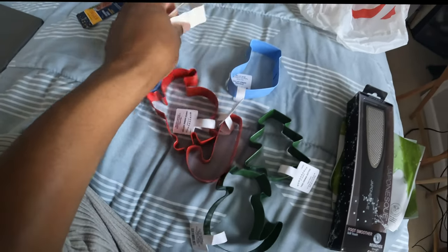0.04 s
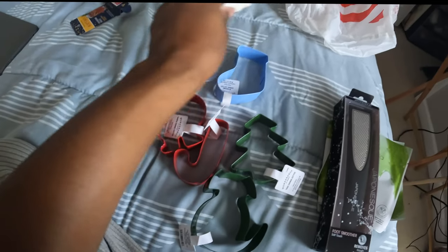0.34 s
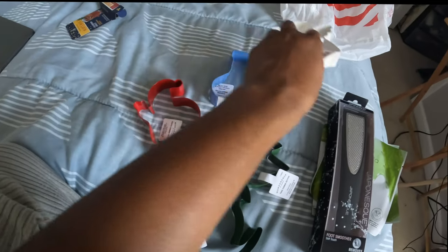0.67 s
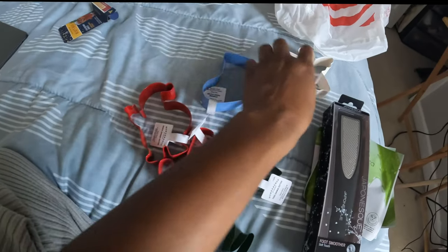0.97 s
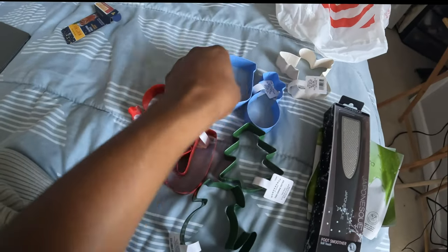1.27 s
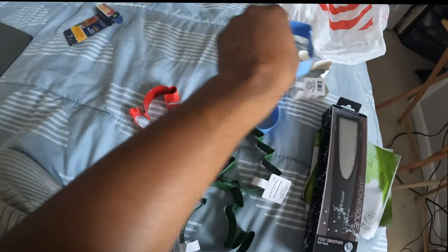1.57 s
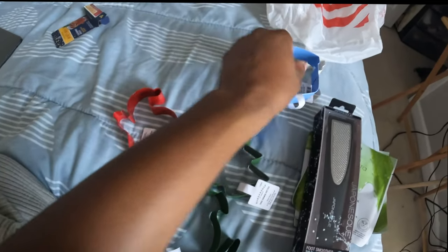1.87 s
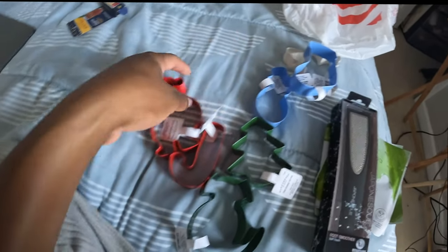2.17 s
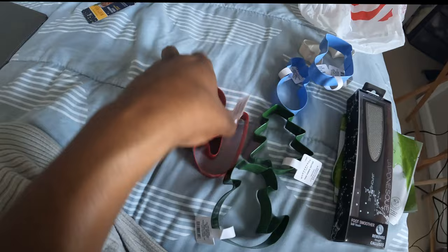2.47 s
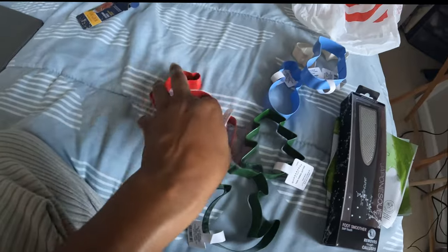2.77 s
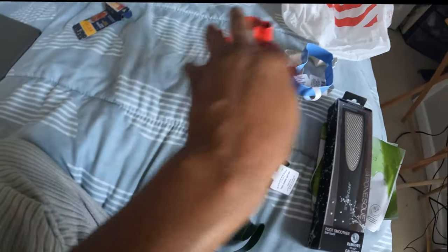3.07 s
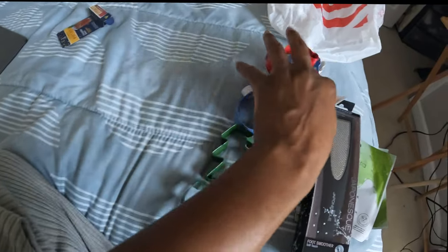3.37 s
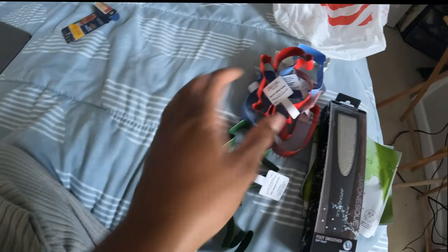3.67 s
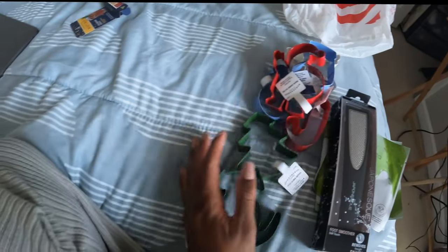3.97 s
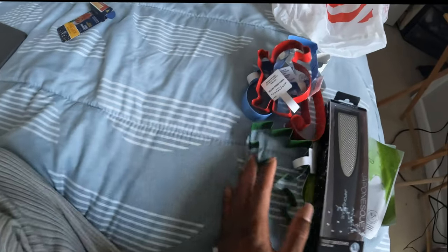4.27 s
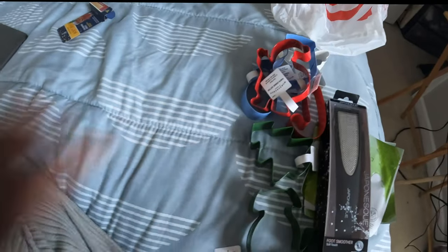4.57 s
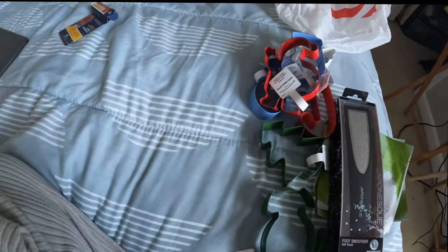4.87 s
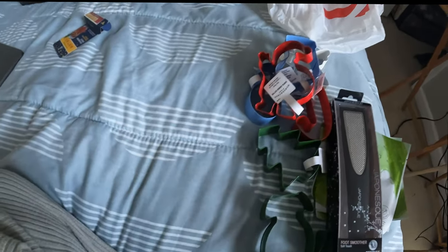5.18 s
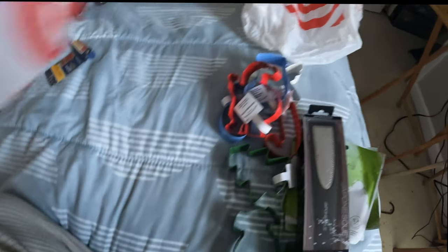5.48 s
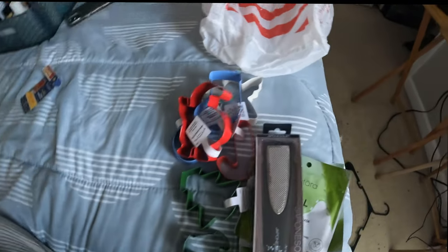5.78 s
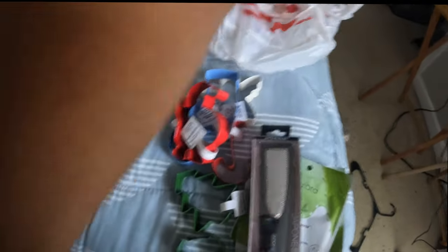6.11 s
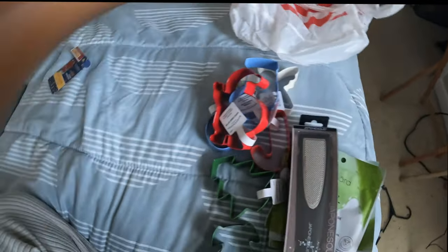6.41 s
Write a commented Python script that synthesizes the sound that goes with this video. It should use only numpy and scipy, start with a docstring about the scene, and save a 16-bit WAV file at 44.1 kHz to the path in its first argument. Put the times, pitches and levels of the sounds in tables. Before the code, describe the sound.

In a small, soft-sounding room, metal cookie cutters clink and chatter against each other in irregular clusters, the loudest hits slightly overloading the nearby microphone. Fingers and paper tags brush over bedding between the clinks. After a last flurry of clatter and sliding, a thin plastic bag is dragged by with dense crackling, moving from the left toward the centre, while faint handling rumble grows near the end.

```python
"""Painted sheet-metal cookie cutters, picked off a quilt and stacked by hand near a phone in a bedroom. Rims
clash, chatter and ring; the loudest clashes are flattened at their peaks. Fingers and paper tags brush between
the clinks. Then a thin plastic bag is dragged past, its creases buckling, its sheet flapping. The hand holding
the phone rumbles throughout."""
import sys
import numpy as np
from scipy import signal
from scipy.fft import rfft, irfft, next_fast_len
from scipy.io import wavfile

SR = 44100
rng = np.random.default_rng(int(sys.argv[2]) if len(sys.argv) > 2 else 0)


def persist_wave(psi):
    """Save psi, clipped to +-1, as 16-bit WAV."""
    counts = np.round(np.clip(psi, -1, 1) * 32767).astype(np.int16)
    wavfile.write(sys.argv[1], SR, np.atleast_2d(counts).T)


N = 284268
TIME_S = np.arange(N) / SR

# rim clashes: start_s, level_db, chatter_s, tones_db, focus_hz, cutter
CLINKS = [ (0.0614, 4, 0.017, -17, 5000, "white"), (.092, 9, 0.019, -13, 4960, "white"),
          (.176, -20, .006, -3, 5960, "white"), (.22, -21, 0.0033, -12, 5680, "white"),
          (1.007, -1, 0.0065, -4.5, 3970, "star"), (1.037, -4.5, 0.0014, -3.5, 1200, "star"),
          (1.155, -21.5, 0.0022, -6, 5290, "star"), (1.1636, -15.5, 0.0035, -0.5, 7220, "star"),
          (1.179, -5.5, 0.0068, -6, 1920, "star"), (1.4467, -9.5, 0.0069, -3, 5560, "star"),
          (1.487, -19, .002, 0.5, 2470, "star"), (1.9213, 9, 0.012, 0.5, 5600, "blue"),
          (1.977, -7.5, .002, -3, 5700, "blue"), (2.021, -8.5, 0.0031, -12, 3380, "blue"),
          (2.4171, -25.5, .003, -1, 5000, "red"), (2.493, -21, 0.0033, 1, 4400, "red"),
          (2.592, -19, 0.0023, -11, 5760, "red"), (2.7072, -15, 0.0024, 1, 3780, "red"),
          (2.722, -21.5, 0.0037, 1.5, 1880, "red"), (2.897, -26, 0.00085, -15, 5600, "red"),
          (2.981, -18, 0.0013, -3, 3980, "red"), (3.043, -26, .002, -20, 5560, "red"),
          (3.4535, 5.5, 0.012, -23, 4800, "pile"), (3.463, -4, .01, 2.5, 3160, "pile"),
          (3.602, -2, 0.0046, -11, 6400, "pile"), (3.617, 5.5, 0.03, -9, 6600, "pile"),
          (3.648, 3, 0.0082, -0.5, 4900, "pile"), (3.726, -8, 0.012, -25, 4630, "pile"),
          (3.753, -11, 0.0033, -8, 1302, "pile"), (3.7814, -7.5, 0.0013, -7, 10900, "pile"),
          (4.017, -.5, 0.013, -8, 3800, "green"), (4.059, -2, 0.011, -22, 5200, "green"),
          (4.099, 3, 0.0017, -15, 10200, "green"), (4.128, 4, 0.013, -7, 5600, "green"),
          (4.217, -8, .004, -4.5, 5600, "green"), (4.282, -12.5, 0.0026, -6, 3970, "green"),
          (4.3325, -11.5, 0.0016, 4, 3120, "green"), (4.342, -12.5, 0.0042, -1, 4860, "green"),
          (4.399, -6.5, 0.0029, -4, 1500, "green"), (4.417, -22.5, 0.0016, 6, 4960, "green")]
# knocks damped by fingers or quilt: start_s, level_db, centre_hz, t60_s
KNOCKS = [(0.206, -14, 1360, 0.033), (.29, -18, 1870, .016), (1.372, -16, 1960, 0.05),
          (1.46, -22, 74.5, 0.22), (1.536, -11, 2200, 0.031), (1.586, -30.5, 2760, 0.019),
          (1.872, -36, 2500, 0.093), (1.8977, -22.5, 3000, 0.06), (1.932, -12, 1203, 0.21),
          (1.952, -16, 74.6, .2), (2.5, -21.5, 88, .3), (2.542, -19, 3950, .028),
          (2.677, -21.5, 2660, .023), (2.7773, -18, 3170, 0.017), (3.5544, -8, 2370, .014),
          (3.557, -13, 795, 0.42), (3.559, -15.5, 217, 0.249), (3.739, -16.5, 1190, 0.19),
          (3.8387, -15, 1380, 0.015), (4.401, -13, 1170, 0.33)]
# modes per cutter: mode_hz, level_db
CUTTER_MODES = {"white": [(1809, -8), (2105, -6), (3077, -6), (4519, -2), (4646, 0), (5712, -3), (6856, -3),
                (7612, -6), (7760, -6), (9582, -5)], "star": [(1069, -11), (1214, -7), (1534, 0),
                (1860, -8), (2231, -10), (2385, -6), (2845, -5), (3063, -11), (3370, -10), (3472, -8),
                (3908, -8), (4288, -13), (5268, -5), (6245, -10), (6557, -8), (6656, -5), (10705, -11),
                (11111, -17)], "blue": [(942, -14), (2727, -14), (3152, -14), (4605, 0), (5187, -11),
                (5381, -13), (5782, -5), (6124, -13), (6535, -14), (7965, -14), (9641, -24), (11103, -18)],
                "red": [(1787, -9), (2110, -5), (2842, -10), (3577, -3), (3704, -2), (4393, 0), (4597, -6),
                (5766, -3), (6447, -11), (7655, -7)], "pile": [(1704, -10), (2810, -10), (3128, 0),
                (3521, -6), (3696, -8), (3793, -8), (3938, -1), (4619, -8), (4867, -2), (5227, -2),
                (5335, -2), (5790, -5), (6428, -4), (6947, -1), (8274, -13)], "green": [(2842, -4),
                (3117, 0), (3698, -7), (4280, -7), (4455, -7), (4603, -3), (4883, 0), (4998, -6),
                (5739, -6), (6218, -6), (6713, -5), (7367, -11), (9415, -14), (9512, -13)]}
# ring time per cutter at 4 kHz: t60_s
CUTTER_T60_S = {"white": .11, "star": .12, "blue": .07, "red": .08, "pile": .14, "green": .12}
# treble shelf per cutter: gain_db
CUTTER_TREBLE_DB = {"white": 4.1, "star": 5.4, "blue": -.5, "red": 2.8, "pile": -1.6, "green": 0.57}
# cutters and tags slid over the quilt: start_s, length_s, friction_db, bump_db
STROKES = [(-.05, 0.32, -33, -33.5), (.92, 0.1, -37, -35), (1.15, .09, -45, -48), (1.35, .15, -37.5, -34.5),
           (1.62, 0.1, -65, -43), (2.12, 0.31, -53, -44), (2.455, .12, -38, -38), (2.642, 0.2, -41, -35.5),
           (2.862, .1, -37.5, -50), (3.386, 0.057, -39.5, -48), (3.57, 0.11, -15.5, -38),
           (3.904, 0.39, -31.5, -33), (4.166, 0.24, -22, -27.5), (4.344, 0.091, -27, -24.5),
           (4.48, 0.15, -32.5, -41)]
# pulls on the bag: start_s, length_s, crackle_db, flap_db, crisp_db
PULLS = [(4.642, .07, -22.5, -24, -2), (4.888, 0.11, -12.5, -20, 2.5), (4.986, 0.11, -10.5, -18, 1.5),
         (5.117, 0.092, -11.5, -18, 2), (5.232, 0.2, -17, -21, 2.5), (5.466, 0.23, -18, -26, 4),
         (5.6, 0.092, -17.5, -28, 9), (5.718, 0.043, -14.5, -25, 4), (5.879, 0.43, -21.5, -34.5, 1.5),
         (6.136, .1, -15, -25.5, 2)]
# bag's path past the phone: time_s, left_minus_right_db
BAG_PATH = [(4.7, 6.5), (5.05, 8.5), (5.45, 11), (5.7, 3.5), (5.95, 2.5), (6.25, 1)]

# weak modes of the sheet metal: freq_hz, density_db
METAL_SPECTRUM = [(200, -26.5), (600, -29), (1000, -6.5), (1600, -3.5), (3200, -3.5), (4700, -3.5),
                  (6900, 0), (8500, -10), (10800, -7), (13000, -14.5), (15500, -35.5)]
# friction on cloth and paper: freq_hz, density_db
FRICTION_SPECTRUM = [(200, -11.5), (600, -22), (1100, -2.5), (2400, -4.5), (5000, -6), (7200, -9.5),
                     (8800, -22.5), (11000, -15.5), (15400, -39)]
# quilt thuds and bumps: freq_hz, density_db
QUILT_SPECTRUM = [(35, 6), (80, -1.5), (130, -4.5), (190, 0.5), (290, -8), (450, -18), (1200, -30.5)]
# buckling film: freq_hz, density_db
CREASE_SPECTRUM = [(200, -8), (400, -5.5), (650, -0.5), (830, -2.5), (1060, 2.5), (1500, 1), (4100, -1.5),
                   (7600, -7), (9700, -15.5), (12400, -8.5), (14000, -17.5), (15500, -23)]
# flapping film: freq_hz, density_db
FLAP_SPECTRUM = [(50, -1), (90, 2), (170, 3.5), (270, 0), (400, -13), (700, -13), (1500, -69)]
# hand on the phone: freq_hz, density_db
GRIP_SPECTRUM = [(8, -6), (18, 9), (28, 2), (42, -2), (70, -19.5), (130, -49), (400, -60)]
# still room air: freq_hz, density_db
AIR_SPECTRUM = [(100, -19), (165, -2.5), (270, -12.5), (350, -19.5), (700, -21.5), (1500, -27),
                (4000, -45.5), (15400, -53.5)]

TOP_HZ = 15700


def cutters(thud_db=-20.5, thud_db_per_db=0.6):
    """All clinks and knocks. A harder clink thuds harder, less than in proportion."""
    out = np.zeros((2, N))
    for start_s, level_db, chatter_s, tones_db, focus_hz, cutter in CLINKS:
        relative_thud_db = thud_db + thud_db_per_db * level_db - level_db
        add(out, start_s, undb(level_db) * clink(chatter_s, tones_db, focus_hz, relative_thud_db, cutter))
    for start_s, level_db, centre_hz, t60_s in KNOCKS:
        add(out, start_s, undb(level_db) * knock(centre_hz, t60_s))
    return out * pan(-.3)


def clink(chatter_s, tones_db, focus_hz, thud_db, cutter, bounces_per_s=700, size=12288):
    """Rim bounces on rim: a crack, a crowd of short modes, a few long tones, a thud in the quilt."""
    time_s = np.arange(size) / SR
    bounces = (rng.random(size) < bounces_per_s / SR) * rng.exponential(size=size)
    blows = (time_s == 0) + bounces / (1 + (time_s / chatter_s) ** 6)
    response_db = sheet_response_db(cutter, focus_hz, size)
    crack = colour(noise(size, width=.45), METAL_SPECTRUM, response_db)
    crack *= ring(blows, t60_s=.018) + .2 * ring(blows, t60_s=.1)
    crowd = colour(mode_crowd(size), METAL_SPECTRUM, response_db) * ring(blows, t60_s=.055)
    tones = cutter_tones(cutter, focus_hz, blows, time_s)
    thud = colour(noise(size, width=.096), QUILT_SPECTRUM) * ring(blows, t60_s=.29)
    quilt_damping = 1 / (1 + (time_s / .09) ** 4)
    metal = undb(-6) * crack + undb(-3) * crowd + undb(tones_db - 4) * tones * quilt_damping
    return metal + undb(thud_db) * thud


def cutter_tones(cutter, focus_hz, blows, time_s):
    """Strong modes. Much leaks at once into the touching rim; the rest dies slowly, high modes first."""
    modes_hz, modes_db = np.transpose(CUTTER_MODES[cutter])
    scatter_db = 2 * rng.standard_normal(len(modes_hz))
    gains = undb(modes_db + contact_db(np.log2(modes_hz), focus_hz) + scatter_db)
    leak = .9 * ring(blows, t60_s=.04)
    tones = 0
    for mode_hz, gain in zip(modes_hz, gains / np.linalg.norm(gains)):
        phase_rad = 2 * np.pi * rng.random() + .66 * rng.standard_normal((2, 1))  # per microphone port
        t60_s = CUTTER_T60_S[cutter] * (4000 / mode_hz) ** .5
        tones += gain * np.sin(2 * np.pi * mode_hz * time_s + phase_rad) * (leak + ring(blows, t60_s))
    return tones


def contact_db(log2_hz, focus_hz, peak_db=6.1, width_oct=.31):
    """The place of contact favours one band."""
    return peak_db * np.exp(-((log2_hz - np.log2(focus_hz)) / width_oct) ** 2)


def sheet_response_db(cutter, focus_hz, size):
    """The sheet answers most near its strong modes and in the struck band."""
    modes_hz, modes_db = np.transpose(CUTTER_MODES[cutter])
    bins_hz = np.fft.rfftfreq(size, 1 / SR)
    half_width_hz = 30 + .009 * modes_hz
    detuning = (bins_hz[:, None] - modes_hz) / half_width_hz
    nearness = (undb(modes_db - modes_db.max()) / (1 + detuning ** 2)).sum(axis=1)
    treble_db = CUTTER_TREBLE_DB[cutter] * np.clip((bins_hz - 6500) / 3000, 0, 1)
    return contact_db(log2_bins(size), focus_hz) + treble_db + 10 * np.log10(1 + 7 * nearness)


def mode_crowd(size, count=90):
    """Weak modes, about evenly spread; each clink excites different ones."""
    modes_hz = (np.arange(count) + rng.random(count)) * TOP_HZ / count
    spectrum = np.zeros((2, size // 2 + 1), complex)
    spectrum[:, (modes_hz * size / SR).astype(int)] = noise(count, .35) + 1j * noise(count, .09)
    return irfft(spectrum, size)


def knock(centre_hz, t60_s, size=16384):
    """A held cutter cannot ring: one broad, short resonance."""
    offset_oct = log2_bins(size) - np.log2(centre_hz)
    hump_db = -10 * np.log10(1 + (offset_oct / .9) ** 4 + (offset_oct / 1.7) ** 10)
    band = unit_rms(irfft(rfft(noise(size, width=.44)) * undb(hump_db)))
    return band * ring(np.arange(size) == 0, t60_s)


def bag(attack_s=.053, fade_db_per_s=135):
    """Creases of thin film buckle in dense flurries; the whole sheet flaps when pulled."""
    starts_s, lengths_s, crackle_db, flap_db, crisp_db = np.transpose(PULLS)
    pulls = [swell(*span_s, attack_s, fade_db_per_s) for span_s in zip(starts_s, lengths_s)]
    carried = swell(4.67, 1.23, attack_s, fade_db_per_s) * undb(-26.5)  # crackle between pulls
    buckling = np.hypot(energy_sum(pulls, crackle_db), carried)
    snapping = np.hypot(energy_sum(pulls, crackle_db + crisp_db), carried)  # sharper when taut
    pan_db = np.interp(TIME_S, *np.transpose(BAG_PATH))
    dull, crisp, fizz = crease_bands()
    fizz_gain = undb(1.7 * (pan_db - 9))  # carries only right beside the left port
    film = (dull + fizz * fizz_gain) * buckling + crisp * undb(.5) * snapping
    flaps = colour(noise(N, width=.04), FLAP_SPECTRUM) * energy_sum(pulls, flap_db)
    flaps *= undb(1.65 * wander(rate_hz=35))
    return film * undb(3) * pan(pan_db) + flaps * pan(.84)


def crease_bands():
    """Film snaps in three bands. Long waves reach both ports more alike than short ones."""
    creases = crackle(rate_per_s=7000, spread_db=3.3)
    creases *= undb(.6 * wander(rate_hz=70) + .18 * wander(rate_hz=9.1))
    dull = lowpass(colour(stereo(creases, width=.44), CREASE_SPECTRUM), 3530)
    wide = colour(stereo(creases, width=.58), CREASE_SPECTRUM)
    treble = wide - lowpass(wide, 3980)
    crisp = lowpass(treble, 11900)
    fizz = treble - crisp
    return dull, crisp, fizz


def sliding(attack_s=.052, fade_db_per_s=126, arm_brush_db=-71.5, arm_press_db=-48.5):
    """Friction grains on cloth and paper; the quilt gives under the hand and the resting arm."""
    starts_s, lengths_s, friction_db, bump_db = np.transpose(STROKES)
    strokes = [swell(*span_s, attack_s, fade_db_per_s) for span_s in zip(starts_s, lengths_s)]
    friction = np.hypot(energy_sum(strokes, friction_db), undb(arm_brush_db))
    pressure = np.hypot(energy_sum(strokes, bump_db), undb(arm_press_db))
    snaps = stereo(crackle(rate_per_s=5000, spread_db=.91), width=.35)
    grains = colour(snaps, FRICTION_SPECTRUM) * friction * undb(.95 * wander(rate_hz=40))
    bumps = colour(noise(N, width=.39), QUILT_SPECTRUM) * pressure * undb(1.4 * wander(rate_hz=25))
    return grains + bumps


def grip(level_db=-24.5, swing_start_s=5.27, swing_rise_s=.37, swing_db=8.5):
    """The hand on the phone rumbles, more once it swings the phone round."""
    swing = np.clip((TIME_S - swing_start_s) / swing_rise_s, 0, 1)
    rumble = colour(noise(N, width=.35), GRIP_SPECTRUM)
    return rumble * undb(level_db + swing_db * swing + .9 * wander(rate_hz=2.7)) * pan(1.4)


def bedroom(x, low_t60_s=.31, high_t60_s=.19, split_hz=3000, wet_db=-13, size=22050):
    """Near walls answer within milliseconds; bedding absorbs the treble first."""
    time_s = np.arange(size) / SR
    echoes = noise(size, width=.13)
    low = signal.sosfilt(signal.butter(2, split_hz, fs=SR, output="sos"), echoes)
    high = signal.sosfilt(signal.butter(2, split_hz, "high", fs=SR, output="sos"), echoes)
    onset = np.clip(time_s / .008 - .5, 0, 1)
    tail = (low * undb(-60 * time_s / low_t60_s) - high * undb(-60 * time_s / high_t60_s)) * onset
    tail /= np.linalg.norm(tail, axis=1, keepdims=True)
    return x + undb(wet_db) * signal.fftconvolve(x, tail, axes=1)[:, :N]


def room_air(level_db=-46.5):
    """Faint, steady hush of still air."""
    return colour(noise(N, width=.87), AIR_SPECTRUM) * undb(level_db)


def ring(blows, t60_s):
    """Resonance envelope, peak 1. Blows land at unrelated phases, so their energies add."""
    retention = np.exp(-2 * np.log(1000) / (t60_s * SR))
    envelope = np.sqrt(signal.lfilter([1], [1, -retention], blows) + 1e-18)
    return envelope / envelope.max()


def swell(start_s, length_s, attack_s, fade_db_per_s):
    """Hand movement: gathers speed, holds, dies away."""
    rise = np.clip((TIME_S - start_s) / attack_s, 0, 1) ** 2
    return rise * undb(-fade_db_per_s * np.maximum(TIME_S - start_s - length_s, 0))


def energy_sum(swells, levels_db):
    """Joint amplitude of overlapping movements."""
    return np.sqrt(undb(levels_db) ** 2 @ np.square(swells) + 1e-18)


def crackle(rate_per_s, spread_db):
    """Two trains of randomly timed snaps, a few larger than the rest."""
    sizes = undb(spread_db * np.minimum(rng.exponential(size=(2, N)), 4))
    fires = rng.random((2, N)) < rate_per_s / SR
    return fires * sizes * np.sign(rng.standard_normal((2, N)))


def wander(rate_hz):
    """Random drift, standard deviation near 2."""
    steps = rng.standard_normal(4096)
    return 2.5 * np.interp(TIME_S * rate_hz, np.arange(len(steps)), steps)


def noise(size, width):
    """Stereo white noise."""
    return stereo(rng.standard_normal((2, size)), width)


def stereo(sources, width):
    """Two unrelated signals as mid and side, rms 1."""
    return unit_rms(sources[0] + width * sources[1] * np.array([[1], [-1]]))


def pan(left_minus_right_db):
    """Left and right gains."""
    gains = undb(np.array([[.5], [-.5]]) * left_minus_right_db)
    return gains / gains.mean(axis=0)


def from_right(x, lag_s):
    """A source on the right reaches the left port later."""
    size = next_fast_len(N + 64)
    delay = np.exp(-2j * np.pi * np.fft.rfftfreq(size, 1 / SR) * lag_s)
    return np.array([irfft(rfft(x[0], size) * delay, size)[:N], x[1]])


def colour(x, spectrum, extra_db=0):
    """Filter by (freq_hz, density_db) points, to rms 1."""
    freq_hz, density_db = np.transpose(spectrum)
    size = next_fast_len(x.shape[-1])
    gain = undb(np.interp(log2_bins(size), np.log2(freq_hz), density_db) + extra_db)
    return unit_rms(irfft(rfft(x, size) * gain, size)[..., :x.shape[-1]])


def lowpass(x, cutoff_hz):
    """Zero-phase low-pass."""
    return signal.sosfiltfilt(signal.butter(2, cutoff_hz, fs=SR, output="sos"), x)


def log2_bins(size):
    """Log2 frequency of each Fourier bin."""
    return np.log2(np.fft.rfftfreq(size, 1 / SR) + 1)


def add(out, start_s, sound):
    """Mix a sound in at start_s."""
    start = int(start_s * SR)
    out[:, start:start + sound.shape[1]] += sound[:, :N - start]


def unit_rms(x):
    """Scale to rms 1."""
    return x / np.sqrt(np.mean(x ** 2) + 1e-18)


def undb(db):
    """Decibels to gain."""
    return np.exp(np.asarray(db) * np.log(10) / 20)


def scene():
    """Cutters, hands and bag in the room, over grip rumble and still air."""
    air = room_air()
    stacking = from_right(cutters() + sliding(), lag_s=14e-6)
    return bedroom(stacking + bag()) + grip() + air


def record(dry, ceiling=.95):
    """The loudest clashes are flattened at their peaks; a steep low-pass cuts the top."""
    flattened = dry / (1 + np.abs(dry / ceiling) ** 6) ** (1 / 6)
    return signal.sosfilt(signal.ellip(8, .2, 70, TOP_HZ, fs=SR, output="sos"), flattened)


dry = scene()
out = record(dry)
persist_wave(out)
```